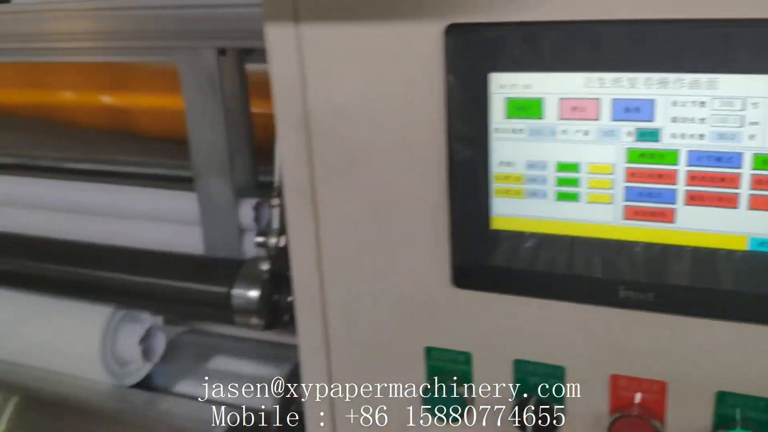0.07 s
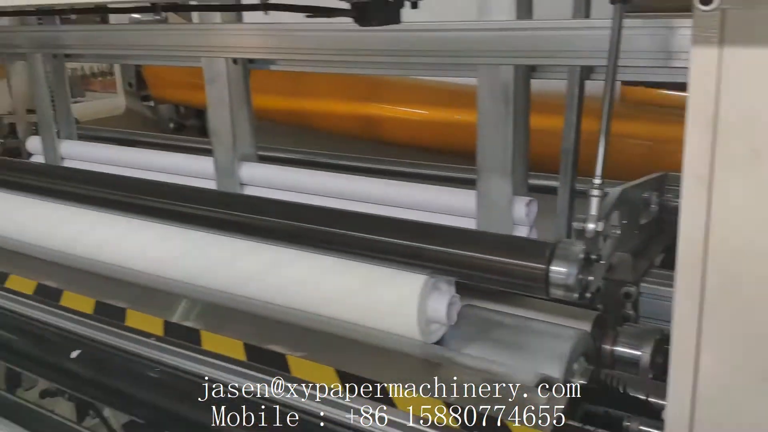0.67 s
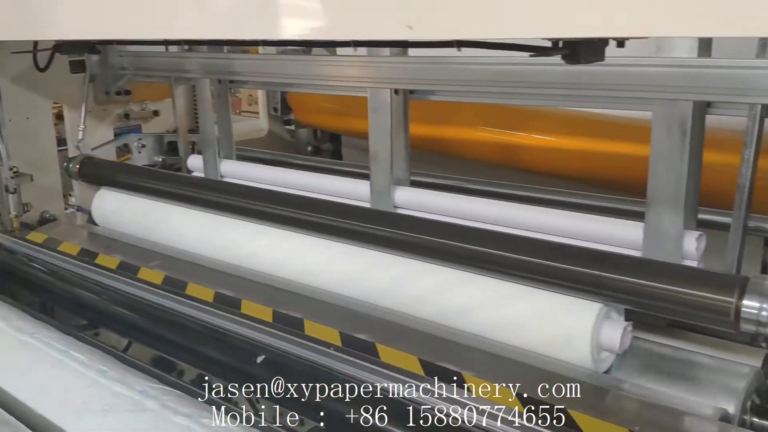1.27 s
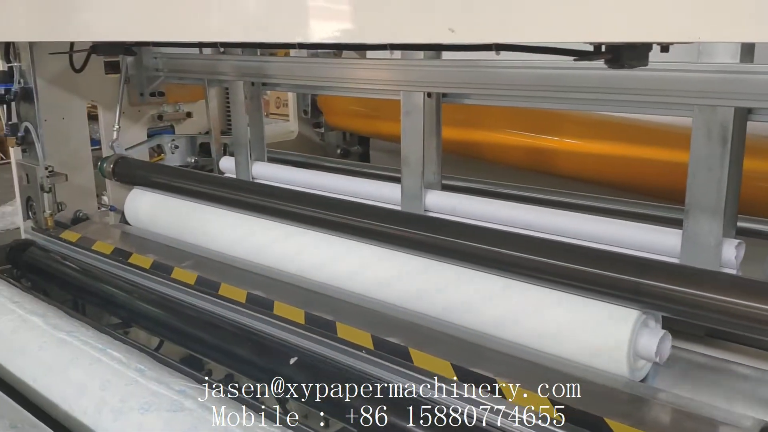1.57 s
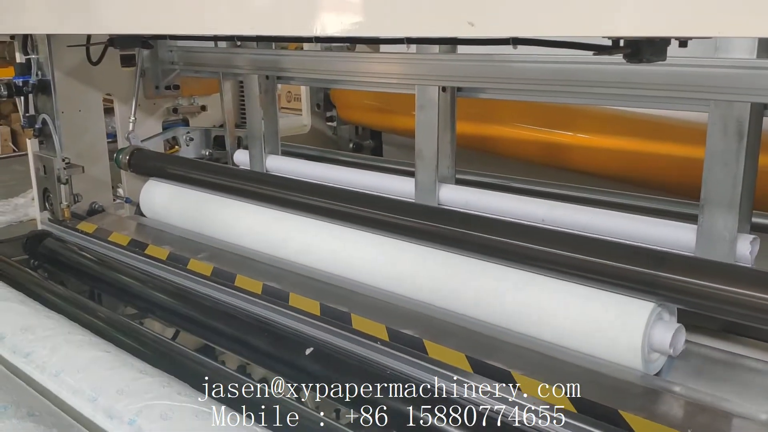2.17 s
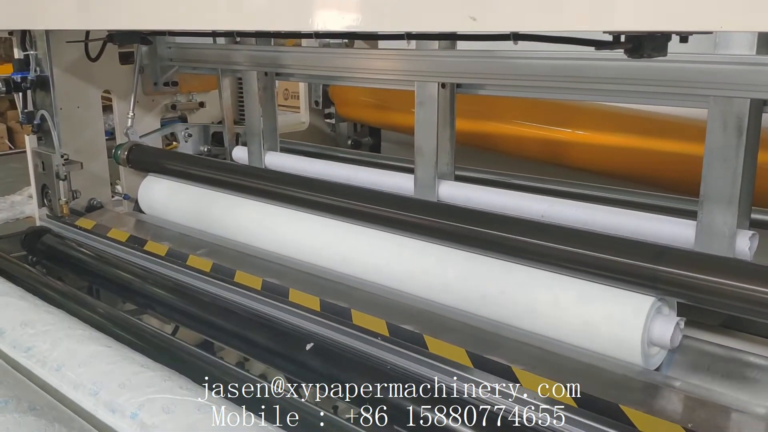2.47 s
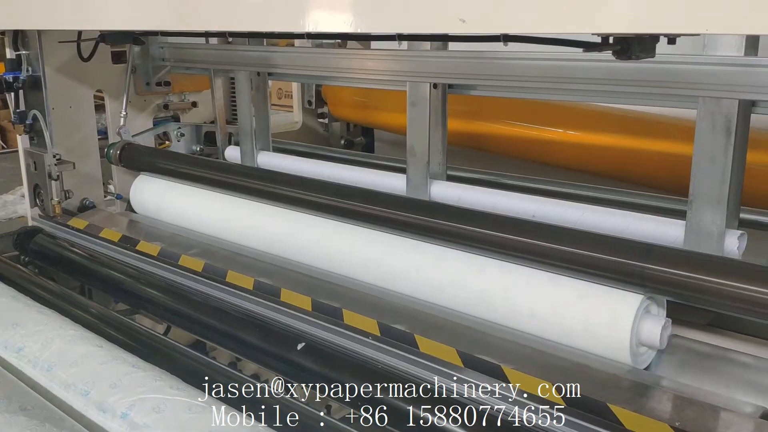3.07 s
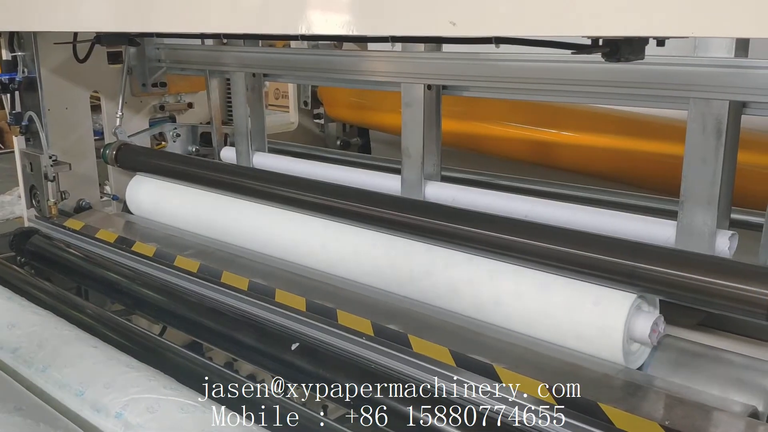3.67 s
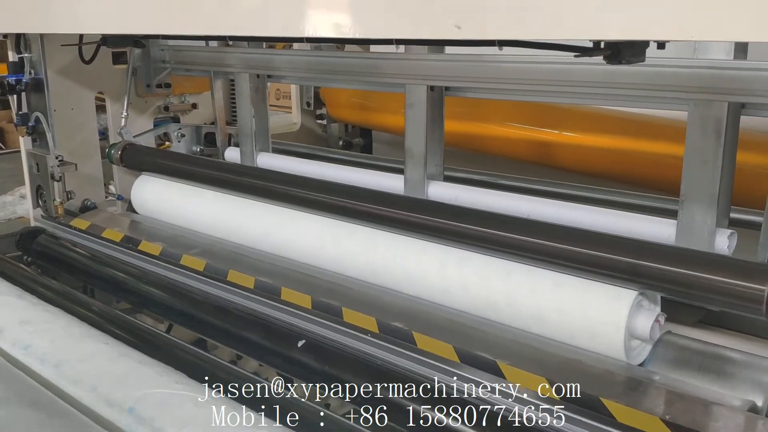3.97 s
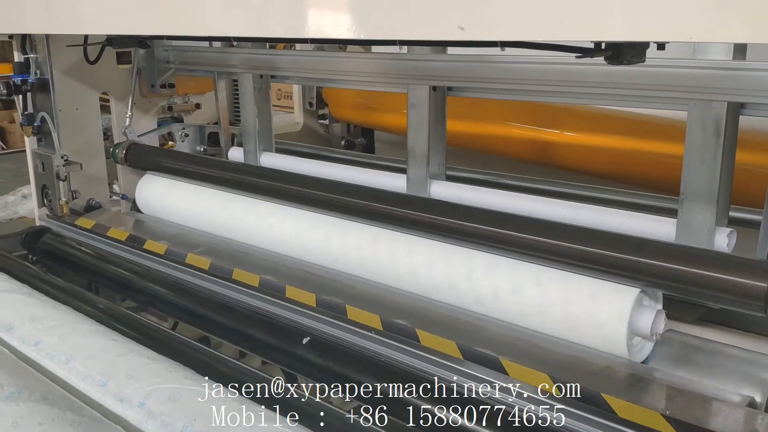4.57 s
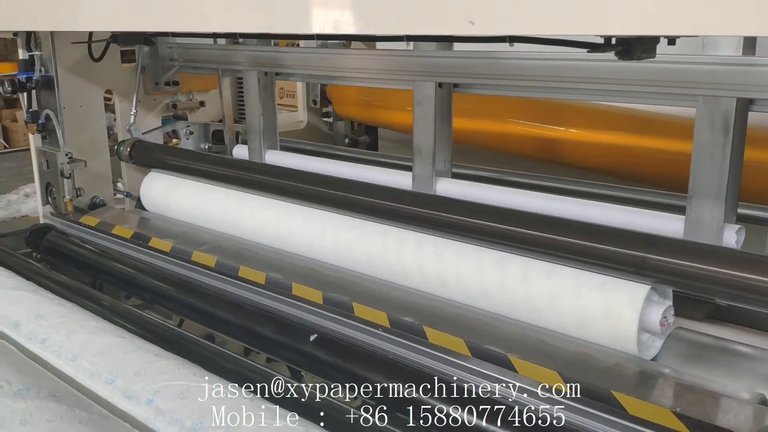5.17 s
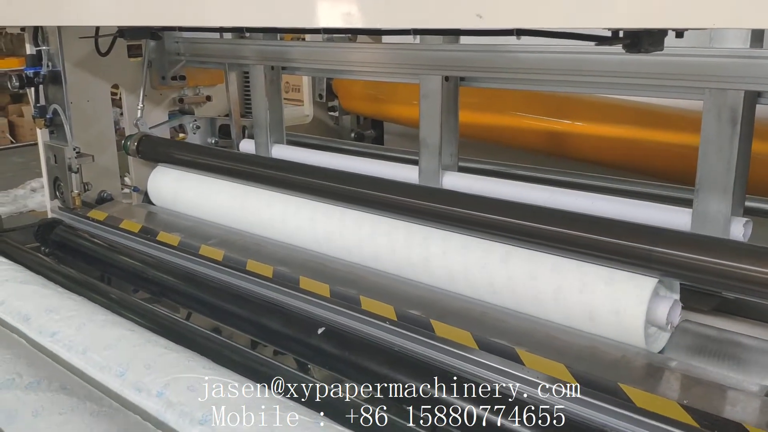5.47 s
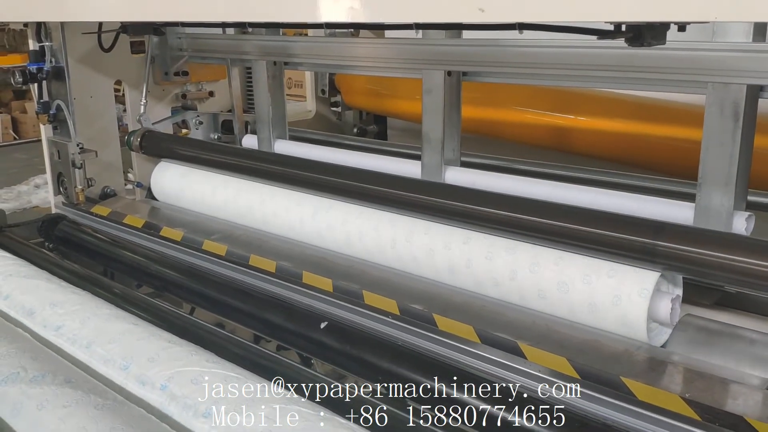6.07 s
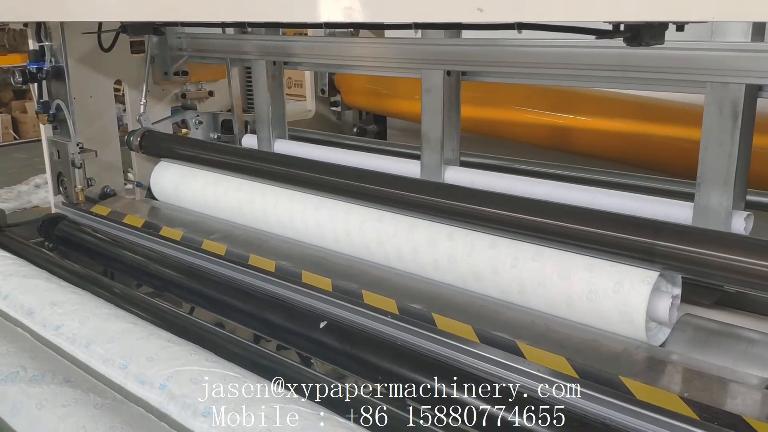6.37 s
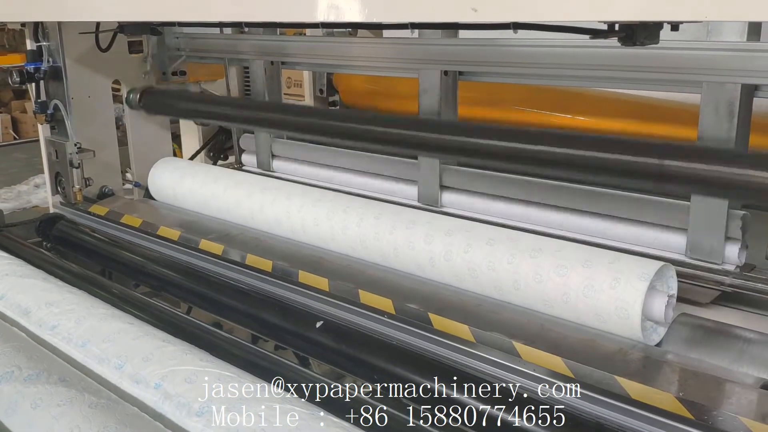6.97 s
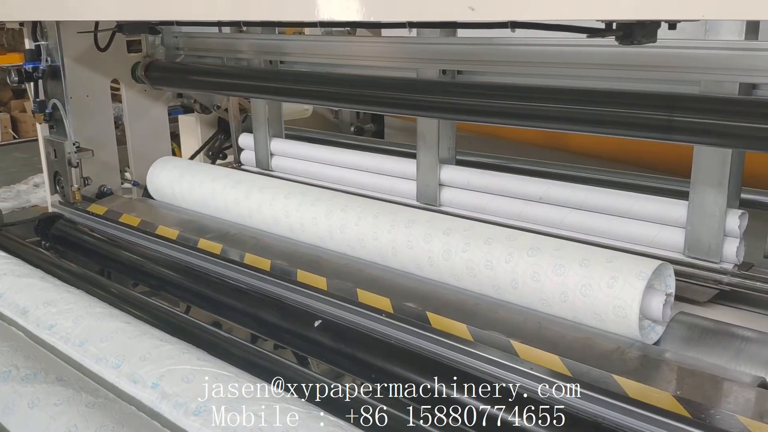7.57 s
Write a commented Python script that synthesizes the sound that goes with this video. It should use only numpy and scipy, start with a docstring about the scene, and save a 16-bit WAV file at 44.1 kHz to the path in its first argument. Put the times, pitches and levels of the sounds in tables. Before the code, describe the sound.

A paper winding machine rumbles, whines and swishes, slows to a stop, then hisses air as a steel roller thuds.

```python
"""Rollers rumble, paper rushes and a drive whines: a paper rewinder at full speed in a factory hall,
its roll swishing once a turn. It brakes: tones slide down, the slack web drags and scuffs, bearings
knock, and the hum of the hall and its inverter remains. Air hisses through a valve, the pressure
roller thuds against its stop and rings, and a cylinder vents."""
import sys
import numpy as np
from scipy import signal
from scipy.fft import rfft, irfft, next_fast_len
from scipy.io import wavfile
from scipy.ndimage import uniform_filter1d

SR = 44100
rng = np.random.default_rng(int(sys.argv[2]) if len(sys.argv) > 2 else 0)


def pcm_store(signal):
    """Save signal as 16-bit PCM."""
    levels = np.round(np.clip(np.atleast_2d(signal), -1, 1) * 32767)
    wavfile.write(sys.argv[1], SR, levels.astype(np.int16).T)


N = 345303
TIME_S = np.arange(N) / SR
BINS_HZ = np.maximum(np.arange(N // 2 + 1) * SR / N, 1)
TOP_HZ = 14330

# steel roller resonances: centre_hz, width_hz, gain_db
STEEL_MODES = [(4520, 380, 8), (7750, 300, 9), (10420, 300, 11), (11620, 330, 12)]


def undb(db):
    """Decibels to gain."""
    return 10 ** (np.asarray(db) / 20)


def unit(x):
    """Scale to rms 1."""
    return x / np.sqrt(np.mean(x ** 2))


def curve(points):
    """Join (freq_hz, value) points on a log-frequency axis."""
    hz, value = np.transpose(points)
    return np.interp(np.log(BINS_HZ), np.log(hz), value)


def shape(x, gain):
    """Filter with one gain per bin."""
    size = next_fast_len(N + SR // 10, True)
    padded_gain = np.interp(np.arange(size // 2 + 1) * SR / size, BINS_HZ, gain)
    return irfft(rfft(x, size) * padded_gain, size)[..., :N]


def resonances(modes):
    """Gain of a body that lifts the bands around its modes."""
    return 1 + sum(undb(db) / (1 + (2 * (BINS_HZ - hz) / width_hz) ** 2) for hz, width_hz, db in modes)


def noise(spectrum):
    """Coloured stereo noise: bass alike at both microphone ports, treble unrelated."""
    # likeness of the ports: freq_hz, correlation
    likeness = [(30, 0), (80, 0.74), (200, 0.85), (380, 0.73), (700, 0.3), (1300, 0), (14000, 0.074)]
    gain, correlation = undb(curve(spectrum)), curve(likeness)
    mid = shape(rng.standard_normal(N), gain * np.sqrt(1 + correlation))
    side = shape(rng.standard_normal(N), gain * np.sqrt(1 - correlation))
    return np.array([mid + side, mid - side]) / np.std(mid)


def walk(rate_hz):
    """Smooth random drift, spread about 1."""
    steps = uniform_filter1d(rng.standard_normal(N // 16), size=4)
    return 2 * np.interp(TIME_S * rate_hz * 4, np.arange(len(steps)), steps)


def tone(hz, width_hz):
    """A tone widened by flutter in strength and phase."""
    phase = 2 * np.pi * np.cumsum(hz + np.zeros(N)) / SR
    return walk(width_hz) * np.cos(phase) + walk(width_hz) * np.sin(phase)


def pan(left_minus_right_db):
    """Constant-power stereo gains."""
    return unit(undb(np.array([[left_minus_right_db], [-left_minus_right_db]]) / 2))


def bump(peak_s, half_length_s):
    """Smooth swell."""
    return np.maximum(1 - ((TIME_S - peak_s) / half_length_s) ** 2, 0) ** 2


def burst(start_s, level_db, attack_s, t60_s):
    """Linear attack, exponential decay."""
    age_s = TIME_S - start_s
    return np.clip(age_s / attack_s, 0, 1) * undb(level_db - 60 * np.maximum(age_s - attack_s, 0) / t60_s)


def line_speed(hunt_share=.0054, hunt_hz=1, hunt_peak_s=.468, hunt_fade_s=.25):
    """Share of full speed: the drive hunts gently, then the brake bites and eases to a stop."""
    # brake force: time_s, share
    brake = [(2.53, .105), (3.8, 1), (6.06, .483)]
    slowing = np.cumsum(np.interp(TIME_S, *np.transpose(brake), left=0, right=0))
    driven = np.clip(1 - (TIME_S - brake[0][0]) / hunt_fade_s, 0, 1)
    hunting = hunt_share * driven * np.cos(2 * np.pi * hunt_hz * (TIME_S - hunt_peak_s))
    return 1 - slowing / slowing[-1] + hunting


def turns(speed, full_speed_hz=5.17):
    """Turns of the roll so far."""
    return full_speed_hz * np.cumsum(speed) / SR


def roll_pressure(speed, start_cycles=.51, oval=.04):
    """The out-of-round roll presses four times a turn, every other time harder."""
    phase = 2 * np.pi * (4 * turns(speed) + start_cycles)
    return np.cos(phase) + oval * np.cos(phase / 2)


def running(speed, full_db, exponent, idle_db):
    """Gain that grows with speed above an idle floor."""
    return np.hypot(undb(full_db) * speed ** exponent, undb(idle_db))


def rollers(speed):
    """Rollers rumble; motor tones follow the speed down through the frame's resonances."""
    # rumble: freq_hz, density_db
    spectrum = [(15, -56), (25, -79), (54, -33), (74, -9), (84, -7), (119, -0.5), (195, 0.5), (228, 1.5),
                (362, -1), (437, -6), (493, -3.5), (1030, -13), (1500, -12), (1950, -80), (3300, -120)]
    # motor, belt and gear tones at full speed: pitch_hz, width_hz, level_db, speed_exponent
    motor = [(90.8, 1.8, -36.5, 6.6), (170.4, 14, -42, 1.6), (225.3, 10, -51.5, 1.2),
             (311.8, 12, -40.5, 1.6), (362.3, 20, -44, 1.25), (491, 18, -47, 2.6), (823, 180, -43, 5),
             (1151, 190, -42, 6.6)]
    # frame resonances: centre_hz, width_hz, gain_db
    frame_modes = [(248.4, 33, 16.5), (107, 27, 12)]
    unevenness = undb(.7 * walk(14))
    rumble = noise(spectrum) * running(speed, full_db=-27, exponent=.74, idle_db=-46.5) * unevenness
    tones = sum(undb(db) * tone(hz * speed, width_hz) * speed ** exponent
                for hz, width_hz, db, exponent in motor[1:])
    hz, width_hz, db, exponent = motor[0]
    hum_hz = hz * speed + .26 * width_hz * walk(6.36)
    hum = np.sqrt(2) * undb(db) * np.sin(2 * np.pi * np.cumsum(hum_hz) / SR) * speed ** exponent
    return rumble + hum + shape(tones, resonances(frame_modes))


def paper_drag_db():
    """Friction of slack paper builds slowly, then slips."""
    # drags: slip_s, lift_db, build_s, release_s
    drags = [(3.16, 2.8, .3, 0.17), (3.89, 2.2, 0.8, 0.037), (4.21, 5, 0.3, 0.047), (4.635, 4, 0.38, 0.032),
             (5.29, 7.5, 0.23, 0.1)]
    return sum(np.interp(TIME_S, [slip_s - build_s, slip_s, slip_s + release_s], [0, db, 0])
               for slip_s, db, build_s, release_s in drags)


def bearings(speed):
    """Bearings roar through the guards, louder as the brake comes on and bites."""
    # roar: freq_hz, density_db
    spectrum = [(500, -6), (900, -2.5), (1100, -9), (1550, -6), (1800, 1.5), (2050, 2.5), (3000, 3.3),
                (3900, 3), (4250, 4), (5600, 1.5), (6500, -7), (8000, 2.5), (14000, -21)]
    # guard resonances: centre_hz, width_hz, gain_db
    guard_modes = [(1470, 90, -8), (1720, 110, -6), (2180, 200, -12), (3250, 200, -14), (3950, 140, -5)]
    # brake load: peak_s, lift_db, half_length_s
    loads = [(2.672, 3.5, 0.15), (3.533, 1.5, .65)]
    load_db = sum(db * bump(peak_s, half_length_s) for peak_s, db, half_length_s in loads)
    roar = unit(shape(noise(spectrum), resonances(guard_modes)))
    return roar * running(speed, full_db=-23, exponent=.99, idle_db=-48) * undb(load_db)


def rustle(x, flutter_db=2.1, bands=16):
    """Each band flutters on its own."""
    centres_hz = TOP_HZ * np.linspace(0, 1, bands) ** 1.506
    return sum(shape(x, np.interp(BINS_HZ, centres_hz, band)) * undb(flutter_db * walk(45))
               for band in np.eye(bands))


def web(speed, pressure):
    """Paper rushes over roaring bearings; both dip as the roll presses and swell as the paper drags."""
    # paper rush: freq_hz, density_db
    spectrum = [(3000, -18.5), (6000, -0.5), (6900, -0.5), (7700, 5), (8400, 6.5), (9800, 8), (11500, 5.5),
                (12800, 7), (14300, -4.5)]
    flutter_db = .54 * walk(40) + .49 * walk(270)
    drag_db = paper_drag_db()
    roar = bearings(speed) * undb(.18 * drag_db - .5 * pressure + flutter_db)
    rush = noise(spectrum) * running(speed, full_db=-19.5, exponent=1.5, idle_db=-51.5)
    rush *= undb(drag_db - .84 * pressure + flutter_db)
    return rustle(roar + rush) + sizzle() * undb(-25) * speed * (undb(drag_db) - 1)


def drive(speed, pressure, judder_share=.0055, throb_db=2.6, stall_share=.54, edge_hz=4150):
    """A high whine, roughened by shaft judder, throbs with the roll and radiates from the steel."""
    # whine at full speed: pitch_hz, width_hz, level_db, pan_db, extra_speed_exponent, rattle_db
    partials = [(4755, 130, -28, 1, -1, 1), (4900, 720, -27.3, 2, -1, 1.2), (5125, 170, -29.5, 5, 3, 1),
                (9235, 190, -17.6, -7, 3.8, .5), (9100, 700, -35, -5, 0, 2), (10520, 300, -33, -3, 8, 1),
                (13880, 380, -29, 0, -.6, 2), (18480, 600, -32, 0, 0, 2), (23200, 700, -40, 0, 0, 2)]
    # the whine softens as it slides through this band
    dip_hz, dip_width_hz, dip_db = 7630, 1680, -5
    whine, rattle = 0, walk(55)
    shaft_speed = speed * (1 + judder_share * walk(80))
    for hz, width_hz, db, pan_db, exponent, rattle_db in partials:
        # a different hall path to each port
        ports = np.array([tone(hz * shaft_speed, width_hz) for _ in range(2)])
        gain = undb(db + rattle_db * rattle) * np.maximum(speed, .1) ** exponent
        whine += gain * pan(pan_db) * ports
    stall_fade = 1 - np.exp(-(speed / stall_share) ** 8)
    whine *= speed ** .57 * stall_fade * undb(throb_db * pressure - 1)
    radiation = np.sqrt(resonances(STEEL_MODES)) / (1 + (edge_hz / BINS_HZ) ** 10)
    dip = undb(dip_db * np.exp(-(2 * (BINS_HZ - dip_hz) / dip_width_hz) ** 2))
    return shape(whine, radiation * dip)


def hall(noise_db=-41, waver_share=.008, waver_db=1.1):
    """Distant machines, and wavering inverter and fan tones."""
    # distant machines: freq_hz, density_db
    spectrum = [(25, -33), (60, -6), (120, -1.5), (220, 2.5), (450, -2), (600, -8), (1100, -11),
                (1700, -11), (2700, -9.5), (3400, -22), (5000, -62), (6500, -68), (8500, -14.5),
                (14000, -17)]
    # inverter and fans: pitch_hz, width_hz, level_db, on_s, off_s, fade_s
    tones = [(1425, 125, -48.5, 2.5, 6.9, 0.6), (1962, 600, -52, 2.5, 6.68, 0.56),
             (852, 150, -52.5, 4.4, 6.2, 0.43), (8000, 45, -54, 6, 6.33, .1),
             (213.3, 61, -36.5, 4.5, 5.42, 0.28), (110.2, 50, -44, 4, 5.9, 0.95),
             (288.5, 32, -48, 1, 6.6, .3), (455, 18, -51, 1, 6.9, .2)]
    out = noise(spectrum) * undb(noise_db + .5 * walk(4.8))
    for hz, width_hz, db, on_s, off_s, fade_s in tones:
        gate = np.clip(np.minimum(TIME_S - on_s, off_s - TIME_S) / fade_s + .5, 0, 1)
        waver_hz = min(waver_share * hz, width_hz / 2) * walk(7)
        out += undb(db + waver_db * walk(16)) * gate * tone(hz + waver_hz, width_hz)
    return out


def swishes(speed, full_db=-15, rise_s=.003, decay_s=.008):
    """A swish each turn, then paper scuffs and one late swish of the coasting roll; all ring the steel."""
    # swish: freq_hz, density_db
    spectrum = [(500, -30), (2500, -7), (4200, -7), (5500, -20), (6900, -2), (7600, 3), (8400, -10),
                (10400, -9), (11500, 2), (12300, -10), (14000, -12), (16000, -40)]
    # paper scuffs and one late swish of the coasting roll: peak_s, level_db, half_length_s
    swells = [(2.932, -26, 0.038), (3.878, -16, 0.018), (4.041, -23, 0.013), (4.217, -22.5, .012),
              (4.404, -26, .012), (4.519, -21, .012), (4.638, -25, .014)]
    strokes, turned = 0, turns(speed)
    for turn_s in np.interp(np.arange(1, turned[-1]), turned, TIME_S):
        age_s = TIME_S - turn_s
        strokes += np.clip(age_s / rise_s + 2, 0, 1) * np.exp(-np.maximum(age_s, 0) / decay_s)
    swelling = sum(undb(db) * bump(peak_s, half_length_s) for peak_s, db, half_length_s in swells)
    hiss = unit(shape(noise(spectrum), resonances(STEEL_MODES)))
    return hiss * (undb(full_db) * speed * strokes + swelling)


def sizzle(ticks_per_s=350, centre_hz=8600, spread_octaves=.42, t60_s=.016, scatter_db=4):
    """Dragged paper fibres catch and snap free: tiny pitched ticks."""
    out, age_s = np.zeros((2, N)), TIME_S[:int(t60_s * SR)]
    count = int(ticks_per_s * N / SR)
    starts = rng.integers(0, N - len(age_s), count)
    for start, (pitch, size, side) in zip(starts, rng.standard_normal((count, 3))):
        hz = min(centre_hz * 2 ** (spread_octaves * pitch), .45 * SR)
        tick = undb(scatter_db * size - 60 * age_s / t60_s) * np.sin(2 * np.pi * hz * age_s)
        out[:, start:start + len(age_s)] += pan(6 * side) * tick
    return unit(out)


def knocks(attack_s=.0047):
    """Coasting rollers knock dully in their bearings."""
    # knock: freq_hz, density_db
    spectrum = [(70, -26), (150, -1), (280, -2.5), (420, -12), (650, -12), (1000, -25), (2500, -23),
                (6000, -44)]
    # knocks: start_s, level_db, t60_s
    hits = [(5.566, -33, 0.92), (5.822, -34.5, 0.11), (6.136, -29.5, .11), (6.301, -38, 0.13)]
    return noise(spectrum) * sum(burst(start_s, db, attack_s, t60_s) for start_s, db, t60_s in hits)


def air_valves(rumble_db=-16):
    """Air hisses through the lift valve; later the exhaust valve knocks open, blasts and rumbles."""
    # lift valve puffs: start_s, level_db, attack_s, t60_s
    puffs = [(6.738, -32, 0.015, 0.16), (6.81, -32, 0.091, 0.99), (7.209, -30, .014, 0.15),
             (7.24, -39, 0.053, 0.75), (7.356, -34.5, 0.02, 0.062)]
    # lift valve hiss: freq_hz, density_db
    hiss_spectrum = [(1500, -12), (3500, -7), (5000, -5), (6300, -11), (8000, 0.5), (10500, -0.5),
                     (12500, -3), (14300, -8.5)]
    # exhaust cracks open, then opens fully: start_s, level_db, attack_s, t60_s
    blasts = [(7.742, -28, .006, 1), (7.762, -22.5, 0.011, 0.97)]
    # exhaust jet: freq_hz, density_db
    blast_spectrum = [(350, -61), (600, -21), (990, -18), (1090, -3), (1390, -35), (1510, -3), (1960, -8),
                      (2730, -1.5), (4940, 2), (6270, -3), (11600, 3), (14000, -4)]
    # exhaust port resonances: centre_hz, width_hz, gain_db
    port_modes = [(1750, 250, -3), (2680, 300, -3), (4300, 600, -4), (9000, 500, -6)]
    # exhaust valve body: freq_hz, density_db
    body_spectrum = [(30, -12), (60, -4), (100, -1), (170, 4), (380, -3), (480, -6), (620, -22),
                     (1200, -26)]
    flutter = undb(.9 * walk(120))
    lift_flow = np.sqrt(sum(burst(*row) ** 2 for row in puffs))
    exhaust_flow = np.sqrt(sum(burst(*row) ** 2 for row in blasts))
    blast = shape(noise(blast_spectrum), resonances(port_modes)) + undb(rumble_db) * noise(body_spectrum)
    hiss = noise(hiss_spectrum)
    knock = noise(body_spectrum) * burst(start_s=7.76, level_db=-25.5, attack_s=.008, t60_s=.13)
    return flutter * (hiss * lift_flow + blast * exhaust_flow) + knock


def thuds(ring_db=-5, clatter_db=-5, clatter_t60_s=.5, hall_db=-15, hall_t60_s=1.6, clank_t60_s=.1):
    """The roller hits its stop: soft blows ring low modes, hard ones clank and shake loose parts."""
    # hit and rebounds: start_s, level_db, contact_s, clank_db
    blows = [(7.205, -22.5, 0.0012, -44), (7.215, -20, 0.0014, -29), (7.243, -11, 0.0096, -38),
             (7.328, -23, .0022, -41), (7.348, -20.5, 0.0023, -36), (7.369, -18, 0.0049, -34),
             (7.436, -30.5, 0.0017, -43), (7.605, -16.5, .012, -75)]
    # roller and arm modes: pitch_hz, level_db, t60_s
    arm_modes = [(95.5, -17, 0.55), (136.8, 1.5, 0.37), (151, -3.5, 0.39), (172, -22, 0.47), (189, -12, 1),
                 (253, -10.5, 0.91), (305.6, -5, 0.63), (375.5, 3.5, 0.25), (401, -1.5, 0.36),
                 (494, -8, 0.3), (580, -9, .35), (654, 2.5, 0.37), (910, -8, 0.4), (1026, 0, 0.14),
                 (1365, -8, 0.19), (2514, -12, .3), (2830, -12, .3)]
    # loose parts: freq_hz, density_db
    clatter_spectrum = [(40, -32), (80, -4), (150, 5.5), (400, -2.5), (700, -7), (1100, -14), (1700, -23),
                        (2700, -13.5), (3200, -24), (6000, -21.5), (12000, -47)]
    # steel-on-steel contact: freq_hz, density_db
    crack_spectrum = [(500, -14), (1500, 1), (4000, -6), (12000, -10)]
    # short-lived modes of the stop: centre_hz, width_hz, gain_db
    stop_modes = [(1040, 60, 10), (1400, 110, 11), (2280, 120, 8), (2650, 70, 9), (2870, 80, 17),
                  (3600, 120, 5)]
    ring, clatter_power = np.zeros(N), np.zeros(N)
    hz, mode_db, t60_s = np.transpose(arm_modes)[:, :, None]
    detunings = 1 + .0073 * rng.uniform(-1, 1, (len(blows), len(arm_modes), 1))
    for (start_s, db, contact_s, _), detuning in zip(blows, detunings):
        start = int(start_s * SR)
        age_s = TIME_S[:N - start]
        rise = undb(db) * np.minimum(age_s / (2 * contact_s), 1)
        contact_lowpass = 1 / (1 + (hz * contact_s / 2) ** 2)
        modes = undb(mode_db - 60 * age_s / t60_s) * np.sin(2 * np.pi * hz * detuning * age_s)
        ring[start:] += rise * (contact_lowpass * modes).sum(axis=0)
        hardness = 1 / (1 + (contact_s / .0028) ** 2)
        decay = undb(clatter_db - 60 * age_s / clatter_t60_s) + undb(hall_db - 60 * age_s / hall_t60_s)
        clatter_power[start:] += (rise * hardness * decay) ** 2
    clatter = np.sqrt(clatter_power) * noise(clatter_spectrum)
    clank = unit(shape(noise(crack_spectrum), resonances(stop_modes)))
    clank *= sum(burst(start_s, db, contact_s, clank_t60_s) for start_s, _, contact_s, db in blows)
    return undb(ring_db) * ring + clatter + clank


def ping(pitch_hz=14250, width_hz=140, attack_s=.0055, t60_s=.16):
    """A thin, very high ring as the roller meets its stop and again as it settles."""
    # contacts: start_s, level_db
    contacts = [(7.214, -19), (7.355, -35)]
    return tone(pitch_hz, width_hz) * sum(burst(start_s, db, attack_s, t60_s) for start_s, db in contacts)


def scene():
    """The machine runs, stops and lifts its pressure roller."""
    speed = line_speed()
    pressure = roll_pressure(speed)
    machine = rollers(speed) + web(speed, pressure) + swishes(speed) + drive(speed, pressure) + knocks()
    return machine + hall() + air_valves() + thuds() + ping()


def record(dry, ceiling=.92):
    """A phone with its left port shaded from the treble; peaks are rounded, the top cut steeply."""
    # port shading: freq_hz, left_minus_right_db
    shading = [(100, -.5), (380, -1), (700, -2.5), (1270, -5), (2500, -8.5), (3200, -3), (4400, -1),
               (6100, -1), (7300, -6), (8100, -10), (8600, -17), (11000, -20), (14000, -20)]
    ratio = undb(curve(shading))
    right_gain = np.sqrt(2 / (1 + ratio ** 2))
    heard = np.array([shape(dry[0], ratio * right_gain), shape(dry[1], right_gain)])
    rounded = heard / (1 + (heard / ceiling) ** 8) ** (1 / 8)
    lowpass = signal.ellip(10, .1, 60, TOP_HZ, fs=SR, output="sos")
    return signal.sosfiltfilt(lowpass, rounded)


dry = scene()
out = record(dry)
pcm_store(out)
```